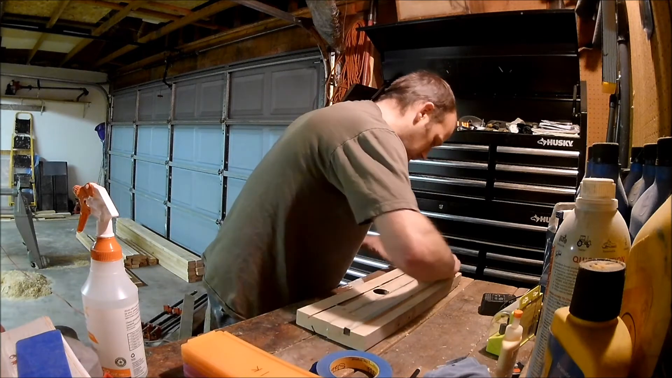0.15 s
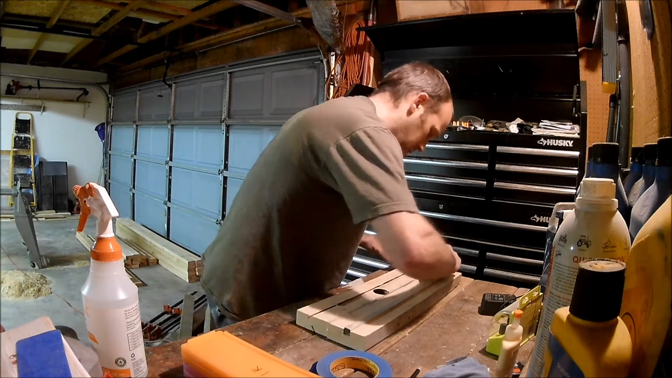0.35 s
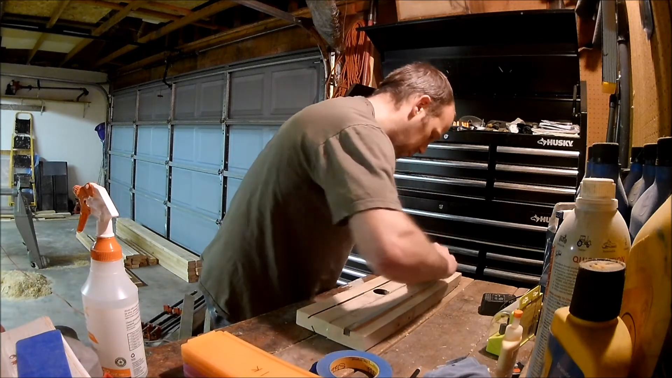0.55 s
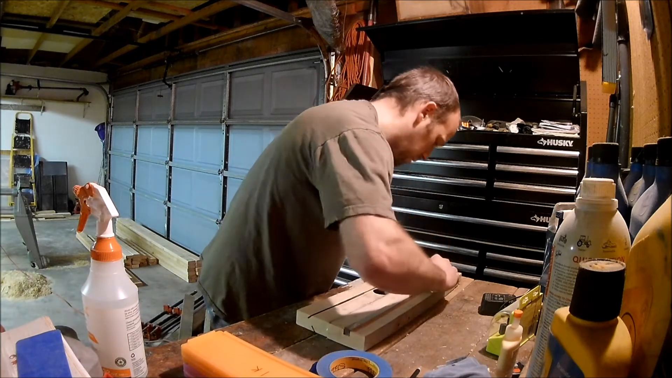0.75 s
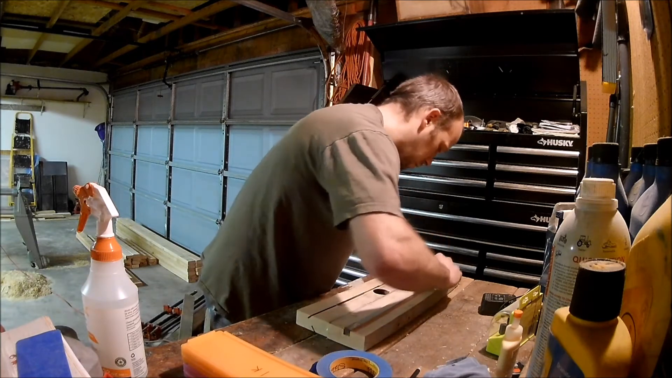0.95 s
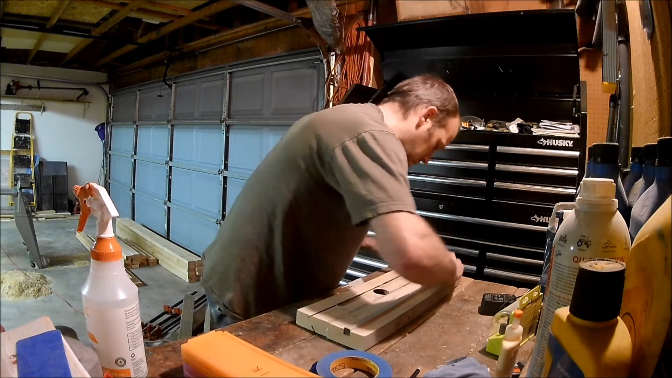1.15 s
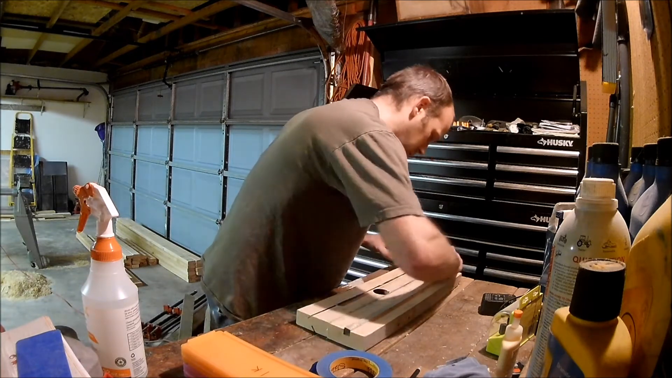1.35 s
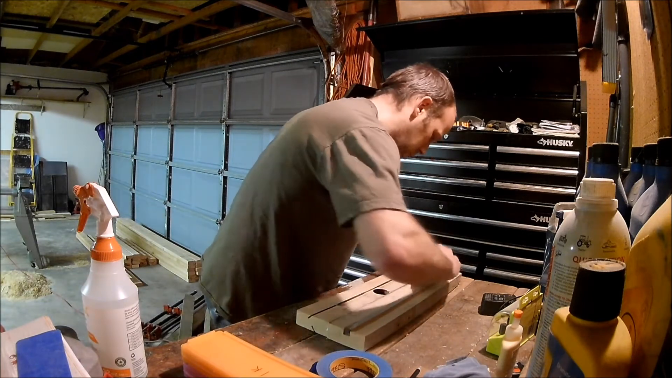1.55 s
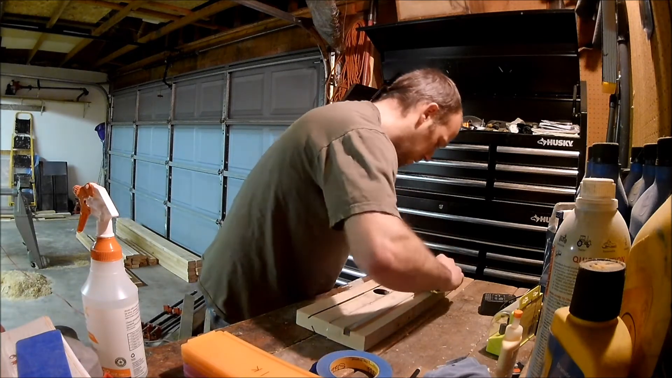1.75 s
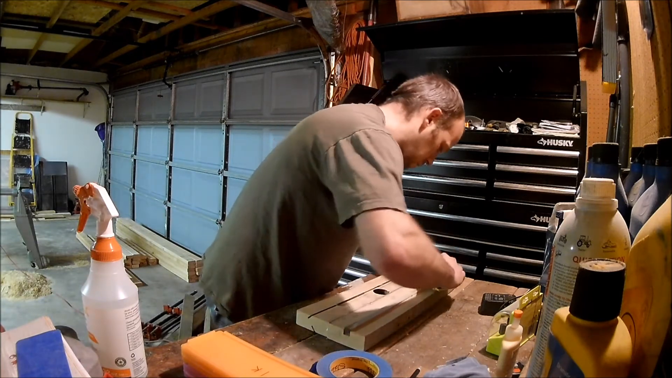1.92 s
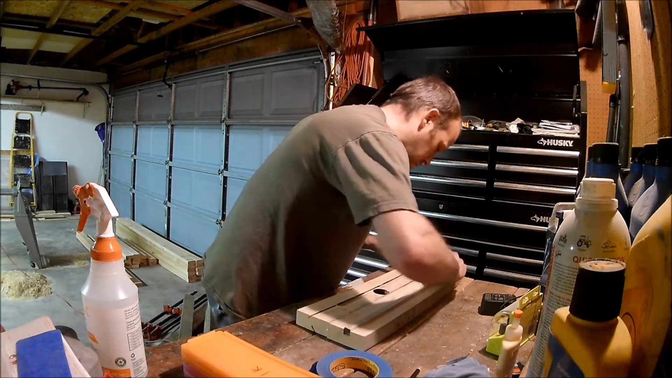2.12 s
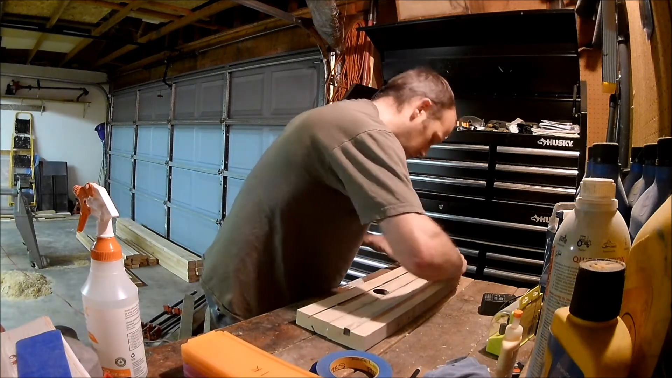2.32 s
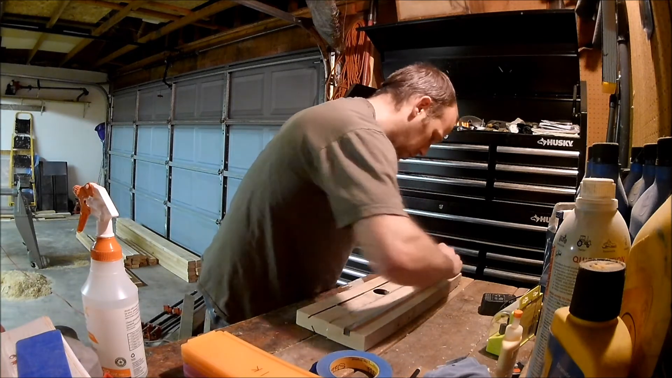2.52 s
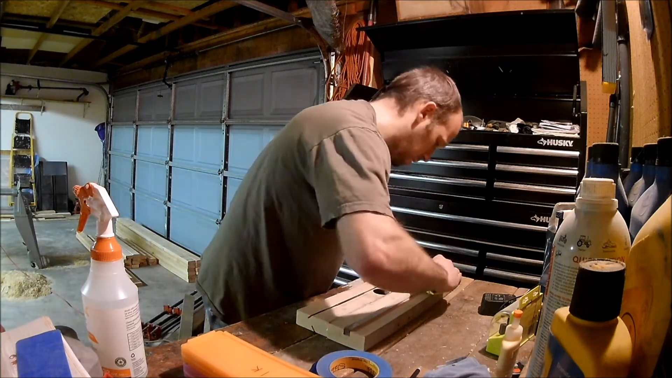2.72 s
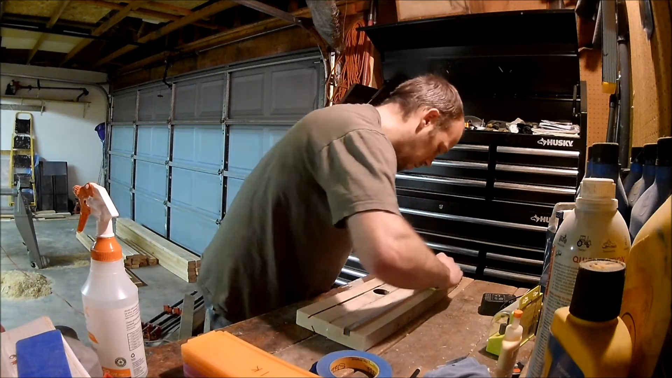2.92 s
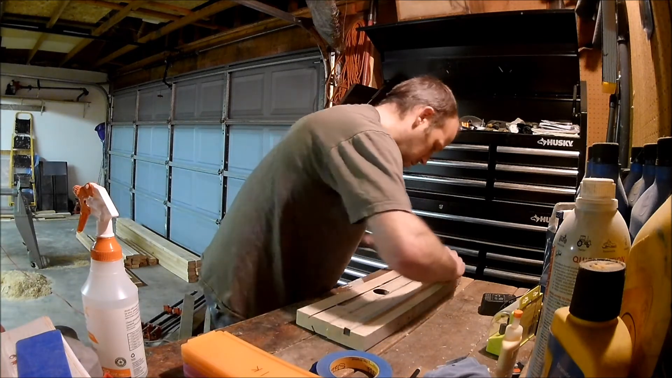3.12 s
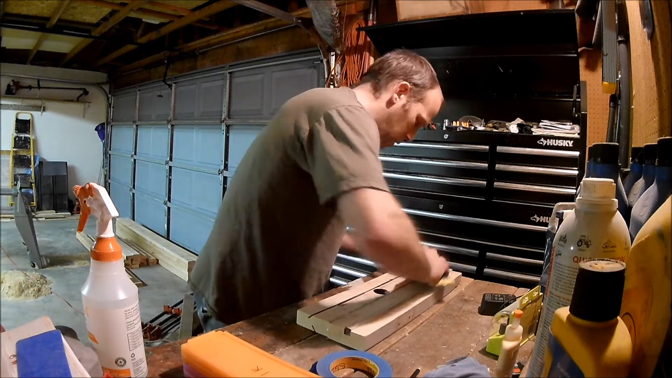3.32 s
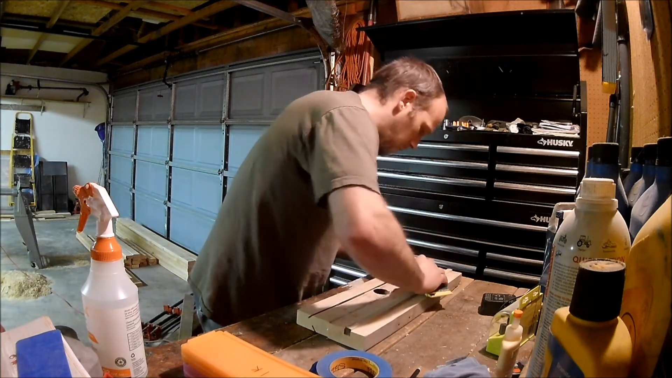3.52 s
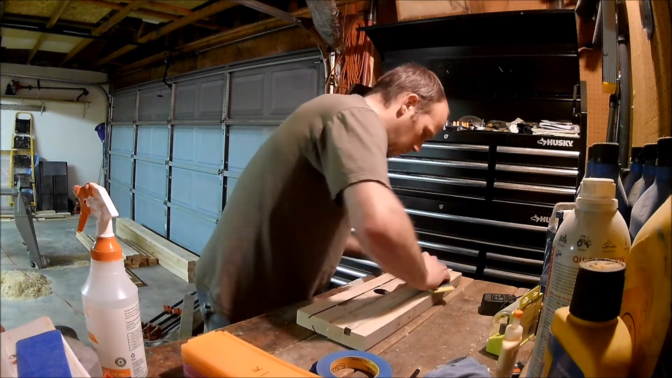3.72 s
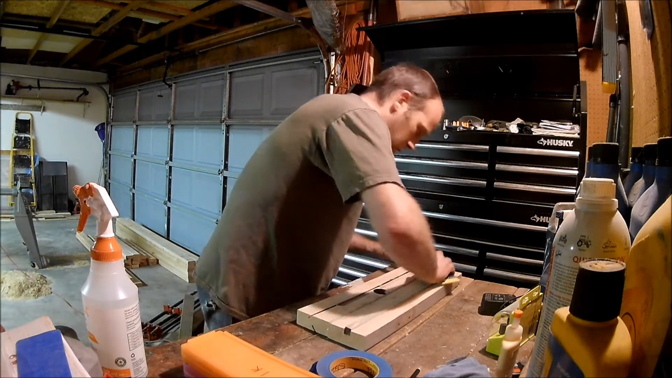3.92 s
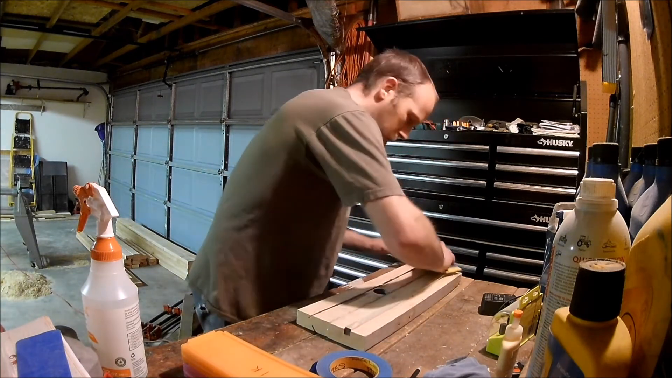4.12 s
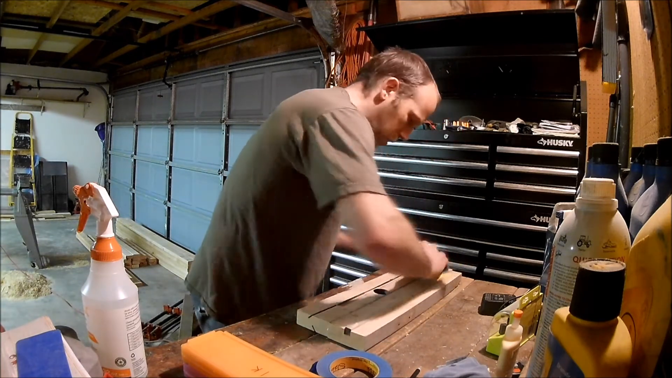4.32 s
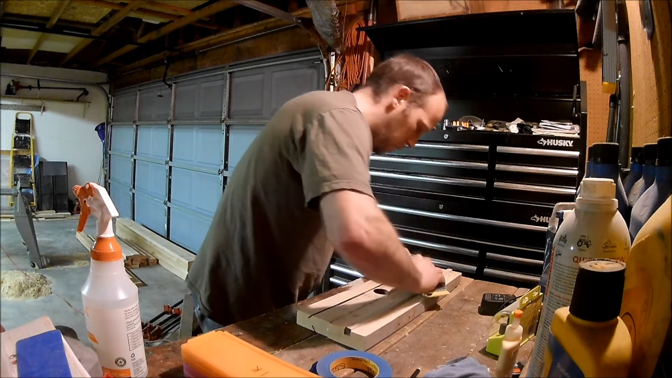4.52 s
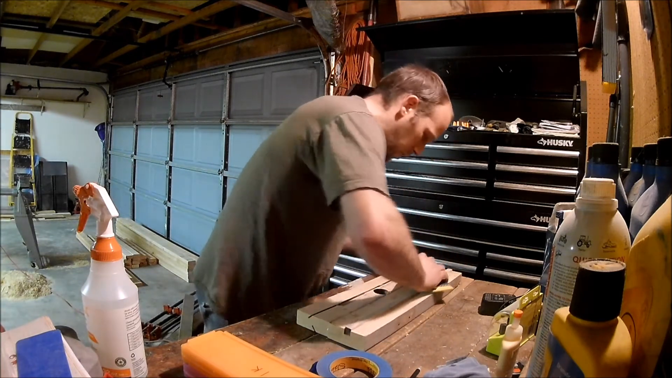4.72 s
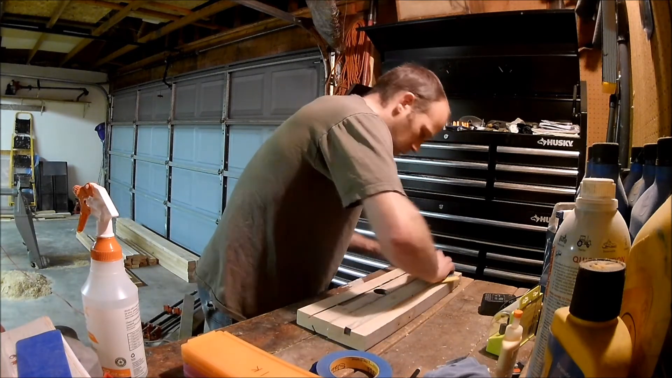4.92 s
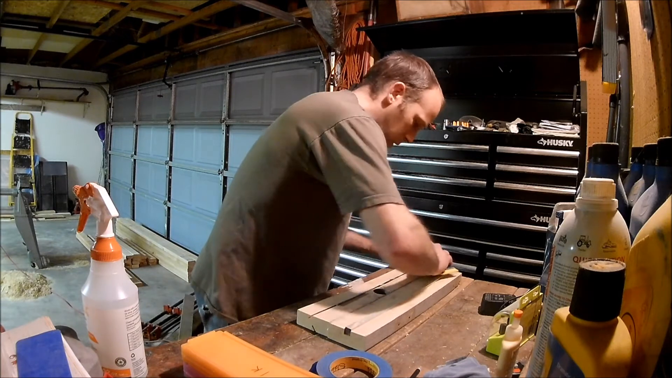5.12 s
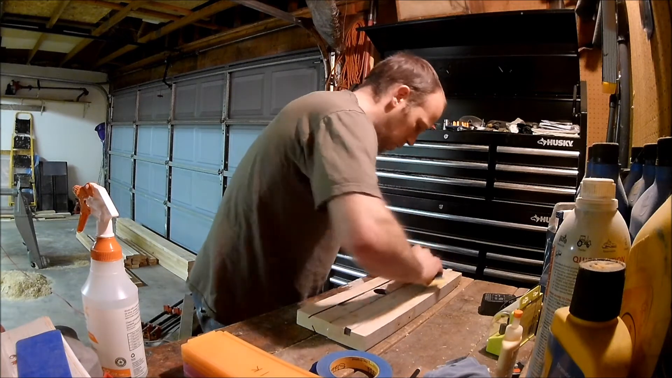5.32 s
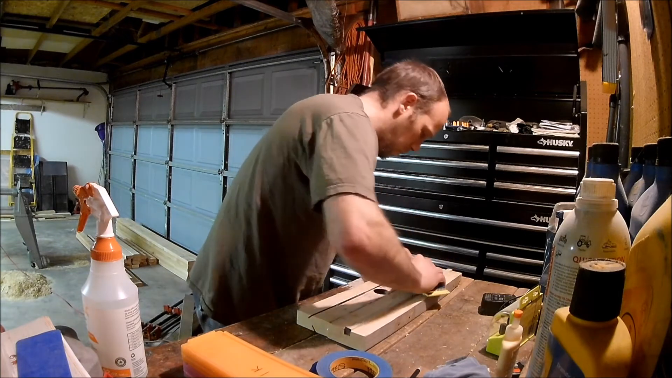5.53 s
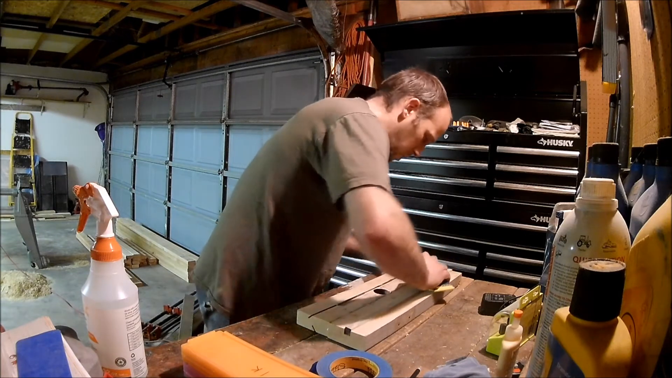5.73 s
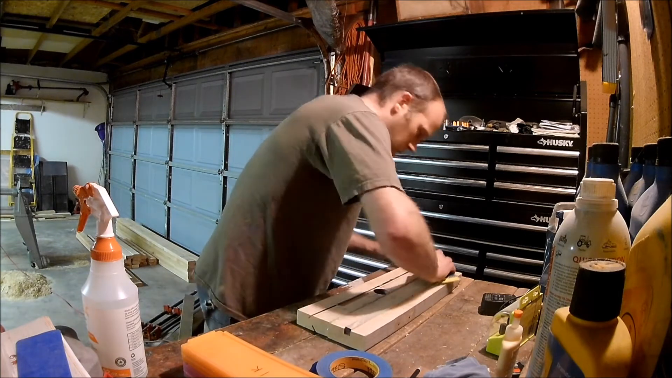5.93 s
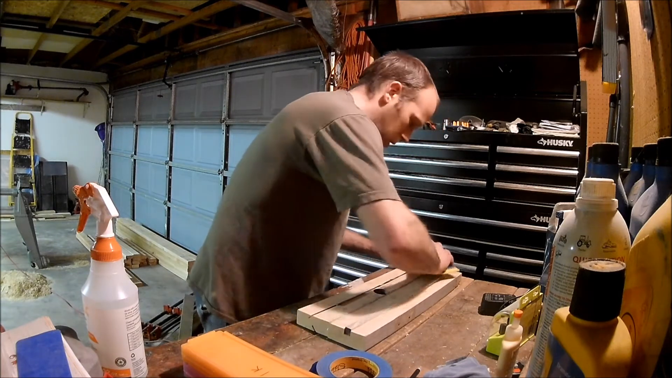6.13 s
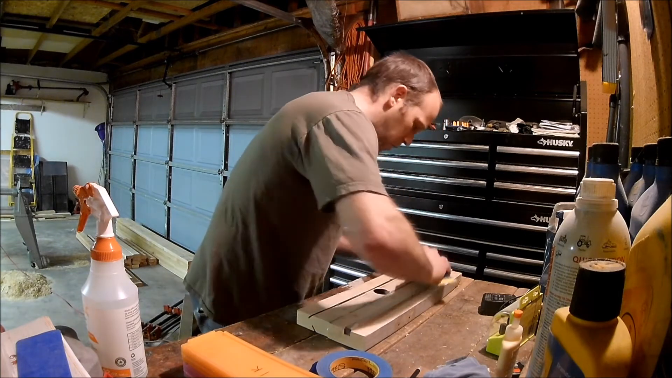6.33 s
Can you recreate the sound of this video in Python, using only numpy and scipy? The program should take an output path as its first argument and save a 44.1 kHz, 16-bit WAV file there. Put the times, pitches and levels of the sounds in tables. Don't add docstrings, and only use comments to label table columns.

```python
import sys
import numpy as np
from scipy import signal
from scipy.fft import rfft, irfft
from scipy.io import wavfile
from scipy.ndimage import uniform_filter1d, map_coordinates

SR = 44100
rng = np.random.default_rng(int(sys.argv[2]) if len(sys.argv) > 2 else 0)


def output_pcm(signal):
    pcm = np.clip(np.atleast_2d(signal).T, -1, 1) * 32767
    wavfile.write(sys.argv[1], SR, np.round(pcm).astype(np.int16))


def boost(x):
    u = np.asarray(x, float) / 20
    return 10 ** u


N = 284881
CHANGE_S = 3.2355


def stone_on_blade():
    # hz, width_hz, level_db
    stone_modes = [(1155, 14, -5), (1267, 26, -2.5), (1419, 28, -3.5), (1579, 63, -2), (1661, 64, -5.5),
                   (1988, 128, -3.5)]
    end_modes = [(291, 64, -7), (390, 41, 2.5), (1690, 47, -3), (2293, 44, -0.5), (2466, 79, -0.5),
                 (2738, 110, -2.5)]
    board_modes = [(518, 90, 2.5), (642, 60, -1), (756.4, 36.6, 5.5), (855.5, 41, 4), (456, 140, -7.5),
                   (973, 74, -0.5), (1180, 270, -10.5)]
    steel_modes = [(3892, 180, 6), (3810, 220, -4.5), (3870, 250, -2.5), (3300, 930, -26.5),
                   (4570, 530, -8.5), (4625, 1100, -7.5), (5870, 1400, -10.5), (6230, 290, -11)]
    bench_modes = [(109.7, 28, 7.5), (135, 100, -10), (182, 4.8, -11.5), (236, 56, 1.5)]
    # hz, level_db
    treble_fall = [(100, -0.5), (6600, -7), (7200, -13), (8000, -13.5), (12000, -8.5)]
    grains = grit(9000, 2.5)
    stone, board, steel, bench = forces()
    load_ratio = np.clip((stone + 1e-9) / (board + 1e-9), 0.1, 2)
    end = boost(-2.5) * stone * load_ratio ** 0.29
    parts = [(stone, stone_modes, 4.24), (end, end_modes, 3.3), (board, board_modes, 2.4),
             (steel, steel_modes, 1.3), (bench, bench_modes, 2.6)]
    sound = clacks()
    for force, modes, wander_db in parts:
        sound = sound + body(force, grains, modes, wander_db, 14)
    return irfft(rfft(sound) * boost(read(treble_fall, np.fft.rfftfreq(N, 1 / SR))), N)


def forces():
    # start_s, fastest_s, lift_s, push_db, board_share_db
    strokes = [
        (-.12, 0.14, 0.23, -44, 3.5),
        (0.321, 0.401, 0.38, -46, 6),
        (0.827, 1.24, 1.32, -46, 4),
        (1.79, 2.06, 2.288, -47.5, 5),
        (2.773, 3.034, 3.274, -47, 6.5),
        (3.554, 3.86, 4.1, -52, 11.5),
        (4.548, 4.82, 5.095, -52, 11),
        (5.547, 5.83, 6.075, -53, 12.5),
    ]
    # start_db, full_speed_db, lift_db
    first_grip = [(-12, -0.5, 0), (-11, -2, -2), (-31.5, -3, -11), (-7, -10, -6.5)]
    second_grip = [(-8, -0.5, 1.5), (-13.5, -0.5, -9.5), (-14.5, -8, -15.5), (-9, -12, -1)]
    # stone_db, board_db, steel_db, bench_db
    tip_db = [(1, -1, 0.55, -0.88), (5, 1, 4.1, -0.62)]
    # stone, board, steel, bench in dB per s
    lift_db_per_s = (600, 470, 503, 300)
    # centre_s, half_length_s, wood_and_stone_db, steel_db
    surges = [
        (1.17, 0.082, 5.5, 1.5),
        (2.098, 0.061, 2, -7),
        (2.208, .04, 1, -2),
        (3.055, 0.043, 1, -5.5),
        (3.767, 0.019, 0.5, 11.5),
        (3.868, .03, -1, -12),
        (4.067, 0.026, 4.5, 11),
        (4.76, 0.073, 2, 8),
        (5.017, 0.017, 2.5, 6),
    ]
    # centre_s, bench_db, board_share_db
    scuffs = [
        (.455, -51.5, -20),
        (2.348, -50.5, -9),
        (4.13, -53, -20),
        (4.3, -61.5, -20),
        (4.86, -54, 3),
        (5.09, -67, -31),
        (6.125, -57.5, -12),
    ]
    tip_s, touch_s, scuff_s = 0.097, 0.063, 0.028
    speed_up, slow_down = 1.44, 1.36
    bench_push_db = -51
    t, level = np.arange(N) / SR, np.zeros((4, N))
    for start, fastest, lift, push_db, board_db in strokes:
        grip = int(start > CHANGE_S)
        first, full, last = np.transpose((first_grip, second_grip)[grip])[:, :, None]
        before = np.clip((fastest - t) / (fastest - start), 0, 1) ** speed_up
        after = np.clip((t - fastest) / (lift - fastest), 0, 1) ** slow_down
        tip = np.exp(-((t - lift + tip_s / 2) / tip_s * 2) ** 2) * np.c_[list(tip_db[grip])]
        lifted = np.maximum(t - lift, 0) * np.c_[list(lift_db_per_s)]
        db = push_db + np.c_[[0, board_db, 0, bench_push_db - push_db]]
        db = db + full + (first - full) * before + (last - full) * after + tip - lifted
        level += boost(db) * np.clip((t - start) / touch_s, 0, 1) ** 1.13
    for s, half, wood_db, steel_db in surges:
        level *= boost(np.c_[[wood_db, wood_db, steel_db, 0]] * np.exp(-((t - s) / half) ** 2))
    for s, db, board_db in scuffs:
        level[1::2] += boost(db + np.c_[[board_db, 0]]) * np.exp(-((t - s) / scuff_s) ** 2)
    return level * boost(0.52 * drift(25) + 0.85 * drift(90))


def grit(per_s, spread_db):
    size = boost(spread_db * np.minimum(rng.exponential(1, N), 4)) * rng.standard_normal(N)
    return evened(size * (rng.random(N) < per_s / SR))


def body(force, grains, modes, wander_db, per_s):
    out = 0
    for hz, width, db in modes:
        caught = force * np.roll(grains, rng.integers(N)) * boost(wander_db * drift(per_s))
        out = out + boost(db) * ring(caught, hz, width)
    return out / np.sqrt(sum(boost(db) ** 2 * np.pi * width / SR for hz, width, db in modes))


def ring(x, hz, width):
    return signal.lfilter(*signal.iirpeak(hz, hz / width, SR), x)


def drift(per_s):
    knots = rng.standard_normal(int(N / SR * per_s) + 4)
    fine = map_coordinates(knots, [1 + np.arange(N // 64 + 2) * 64 / SR * per_s], order=3)
    return np.repeat(evened(fine), 64)[:N]


def evened(x):
    return x / np.sqrt(np.mean(x ** 2) + 1e-20)


def read(points, hz):
    f, value = np.transpose(points)
    return np.interp(np.log(hz + 1), np.log(f + 1), value)


def clacks():
    # start_s, steel_tick_db, board_share_db, stone_share_db, rattle_t60_s
    landings = [
        (0.7128, -50.5, 18, 9.5, 0.19),
        (1.719, -37.5, 12.5, 5, 0.087),
        (2.7005, -42.5, 13, 12.5, 0.13),
        (3.442, -37, 13.5, 9.5, 0.12),
        (4.5092, -35.5, 11.5, 9.5, 0.16),
        (5.444, -38, 4, 13, 0.17),
        (6.4134, -31, 1.5, 1.5, 0.12),
    ]
    # hz, width_hz, level_db
    struck_stone = [(1298, 96, 0), (1690, 220, -4.5), (2170, 180, -1.5), (2446, 200, -2), (2850, 160, -6)]
    struck_wood = [(410, 220, 0), (560, 87, -0.5), (873, 290, -5.5), (1075, 560, -3)]
    struck_steel = [(3880, 76, 3.5), (3850, 31, 0.5), (4070, 390, -5.5), (5050, 180, -9.5),
                    (6080, 650, -15.5)]
    free_end = [(3870, 78, 0)]
    ring_db, ring_t60_s = -8.5, 0.36
    rise_s = np.array([[0.002], [0.002], [0.0004]])
    level = np.zeros((4, N))
    for s, db, board_db, stone_db, t60 in landings:
        at = round(s * SR)
        age = np.arange(min(SR // 4, N - at)) / SR
        rattle = boost(db - 6 - 60 * age / t60) * (1 + 0.69 * np.exp(-age / 0.0063))
        rattle = rattle * np.minimum(age / rise_s, 1)
        level[:3, at:][:, :len(age)] += rattle * boost(np.array([[stone_db], [board_db], [0]]))
        level[3, at:][:len(age)] += boost(db + ring_db - 60 * age / ring_t60_s)
    grains = grit(12000, 1.2)
    parts = struck_stone, struck_wood, struck_steel, free_end
    struck = sum(body(force, grains, modes, 0.99, 3) for force, modes in zip(level, parts))
    struck = struck - 0.68 * ring(struck, 3230, 900)
    return signal.lfilter(*signal.butter(2, 7000, fs=SR), struck)


def thuds():
    # start_s, peak_db, board_hz, bench_share_db, board_t60_s
    blows = [(.368, -38, 630, -2, 0.054), (.721, -35.5, 349, 2, 0.066), (0.754, -36, 312, -0.5, 0.071),
             (1.728, -29, 354, -3, 0.042), (1.751, -39, 390, -3.5, 0.046), (2.701, -31, 514, -0.5, 0.039),
             (2.731, -35, 295, -0.5, 0.066), (3.4521, -28.5, 410, 0.5, 0.046),
             (3.461, -30.5, 560, -9, 0.035), (3.469, -31.5, 276, -14, 0.041), (4.063, -38, 370, -6.5, 0.15),
             (4.5286, -17, 250, -7, 0.026), (4.532, -28, 390, -13, 0.066), (4.538, -27, 560, -26, 0.066),
             (4.567, -38.5, 190, 4.5, 0.06), (5.4653, -19.5, 370.3, -7.5, 0.068),
             (5.477, -32, 353, -25, 0.041), (6.415, -29.5, 287, -3, 0.023), (6.422, -39.5, 390, -18, 0.082)]
    bench_t60_s = 0.18
    t, out = np.arange(SR // 2) / SR, np.zeros(N + SR)

    def tone(hz):
        return np.sin(2 * np.pi * hz * t)

    boom = 0.7 * tone(108) + tone(150) * boost(-160 * t)
    boom += 0.8 * tone(190) * boost(-200 * t) + 0.52 * tone(238) * boost(-300 * t)
    for s, db, hz, bench_db, t60 in blows:
        board = tone(hz) + 0.28 * tone(1.47 * hz) + 0.25 * tone(0.66 * hz)
        board *= boost(db + 0.5 - 60 * t / t60) * (1 - np.exp(-t / 0.0019))
        bench = boom * boost(db + bench_db - 60 * t / bench_t60_s) * (1 - np.exp(-t / 0.0034))
        out[round(s * SR):][:len(t)] -= board + bench
    return signal.lfilter(*signal.butter(4, 93, "high", fs=SR), out[:N])


def squeaks():
    # start_s, peak_db, pitch_hz, length_s
    slips = [
        (1.319, -35, 994, 0.017),
    ]
    out = np.zeros(N)
    for s, db, hz, length in slips:
        u = np.arange(0, length, 1 / SR)
        note = np.sin(2 * np.pi * hz * u) * np.sin(np.pi * u / length)
        out[round(s * SR):][:len(u)] += boost(db) * note
    return out


def garage(x):
    # hz, t60_s
    decay = [(100, 0.45), (400, 0.4), (1500, 0.42), (4000, 0.43), (9000, 0.25)]
    taps = np.zeros(SR)
    at = np.arange(200, SR - 20, 20)
    taps[at + rng.integers(0, 20, len(at))] = rng.choice([-1., 1.], len(at))
    hz, t, z = signal.stft(taps, SR, nperseg=512)
    tail = signal.istft(z * boost(-60 * t / read(decay, hz)[:, None]), SR, nperseg=512)[1]
    return signal.fftconvolve(x, tail[None] / np.linalg.norm(tail), axes=1)[:, :N]


def room_tone():
    # hz, level_db per Hz
    air_colour = [(50, -16), (85, -15), (207, -8), (239, -9), (295, -20.5), (419, -3), (455, -22.5),
                  (526, -0.5), (560, -16.5), (661, -13), (703, -10), (2700, -22.5), (12000, -27.5),
                  (15600, -68), (22000, -120)]
    # pitch_hz, waver_hz, level_db
    hum = [(59.15, .2, -54), (31, 3, -78), (118.3, 2, -76), (237, 4, -79), (527.6, 5, -78)]
    hz = np.fft.rfftfreq(N, 1 / SR)
    colour = boost(read(air_colour, hz))
    air = irfft(rfft(rng.standard_normal(N)) * colour, N) * boost(-72)
    air /= np.sqrt(np.mean(colour ** 2 * (hz > 300)))
    out = air + boost(-62) * evened(ring(rng.standard_normal(N), 60, 27))
    for pitch, waver, db in hum:
        turns = np.cumsum(pitch + waver * drift(6.4)) / SR + rng.random()
        out = out + np.sqrt(2) * boost(db + 1.3 * drift(11)) * np.sin(2 * np.pi * turns)
    return out


def scene():
    work = stone_on_blade() + thuds()
    t = np.arange(N)
    early, late = t < CHANGE_S * SR, t > (CHANGE_S + 0.1) * SR
    wet = garage(np.array([work * early, work * late]))
    mix = work * (early | late) + boost(-11.5) * np.where(early, *wet)
    return (mix + squeaks() + room_tone())[None]


def camera_rounding(x, start_s):
    # hz, step_db
    coarse = [(100, -24), (1500, -18), (3000, -7), (6000, -2), (8000, 2), (12000, 2)]
    # start_s, length_s, above_hz
    starved = [(0.005, 0.02, 7300), (0.11, 0.0089, 9216), (0.13, 0.046, 7300), (0.201, 0.032, 7321),
               (0.262, 0.012, 6140), (0.325, 0.011, 4950), (0.339, 0.019, 4450), (0.364, 0.018, 7114),
               (0.537, 0.014, 508), (1.005, 0.02, 7235), (1.045, 0.018, 9500), (1.173, 0.066, 7300),
               (1.39, 0.017, 4430), (1.903, 0.017, 7050), (2.395, 0.0059, 5500), (2.605, 0.018, 852),
               (2.78, 0.0083, 5100), (4.01, 0.023, 7000), (4.208, 0.0047, 3000), (4.251, 0.0054, 3000),
               (4.54, 0.023, 5080), (4.678, 0.019, 7000), (4.753, 0.013, 7640), (4.826, 0.024, 6260),
               (5.234, 0.0051, 4000), (5.551, 0.019, 5805), (5.705, 0.021, 6850), (5.789, 0.022, 6600),
               (6.256, 0.021, 540), (6.451, 0.011, 7250)]
    window = np.sqrt(signal.get_window("hann", 1536))
    hz, t, z = signal.stft(x, SR, window, nperseg=1536)
    band = np.sqrt(abs(uniform_filter1d(abs(z) ** 2, size=16, axis=0))) + 1e-12
    busy_db = 10 * np.log10((abs(z[hz > 300]) ** 2).sum(0) + 1e-12)
    band_luck = np.repeat(rng.standard_normal((len(t), 49)).T, 16, axis=0)[:len(hz)]
    luck_db = 2.5 * rng.standard_normal(len(t)) + 3.2 * band_luck
    loud_db = 0.3 * np.minimum(busy_db + 57, 7)
    step = band * boost(read(coarse, hz)[:, None] + luck_db + loud_db)
    rounded = np.round(z / step) * step * (hz < 12000)[:, None]
    x = signal.istft(rounded, SR, window, nperseg=1536)[1][:len(x)]
    hz, t, z = signal.stft(x, SR, nperseg=256, noverlap=192)
    for s, length, above_hz in starved:
        during = abs(t + start_s - s - length / 2) < length / 2
        z[np.ix_(hz > max(above_hz, 2200), during)] *= boost(-19)
    return signal.istft(z, SR, nperseg=256, noverlap=192)[1][:len(x)]


def low_pass(x):
    return signal.sosfilt(signal.butter(12, 15800, fs=SR, output="sos"), x)


def record(dry):
    cut = int(np.ceil(CHANGE_S * SR))
    before = camera_rounding(dry[0, :cut], 0)
    after = camera_rounding(dry[0, cut:], CHANGE_S)
    return low_pass(np.concatenate([before, after])[None])


dry = scene()
out = record(dry)
output_pcm(out)
```